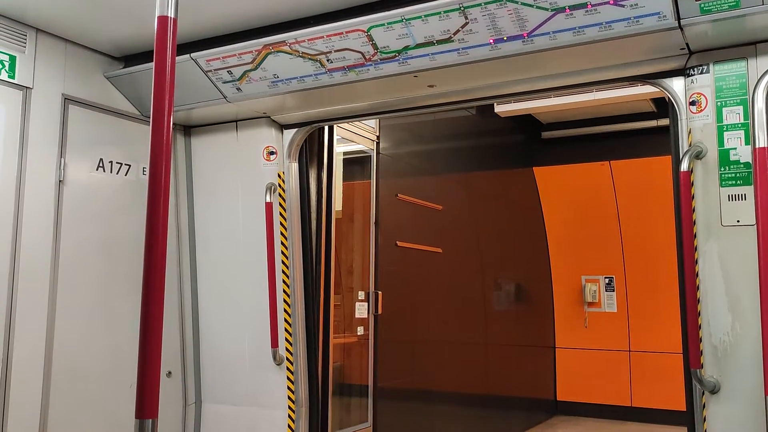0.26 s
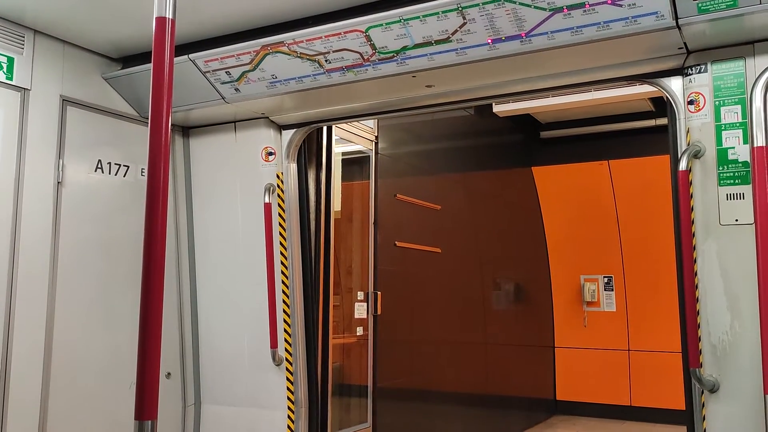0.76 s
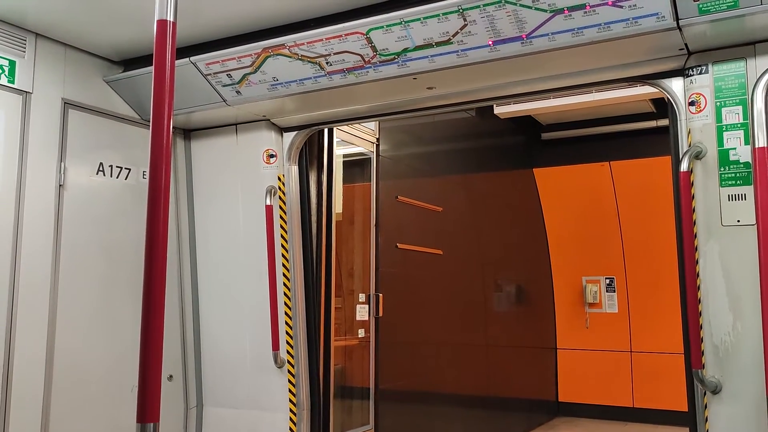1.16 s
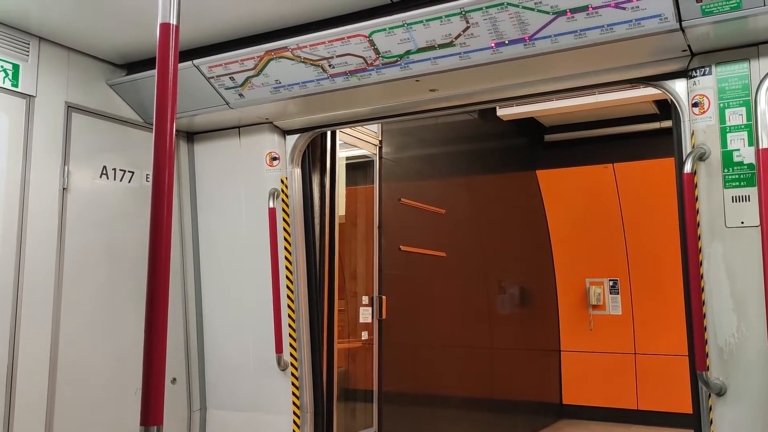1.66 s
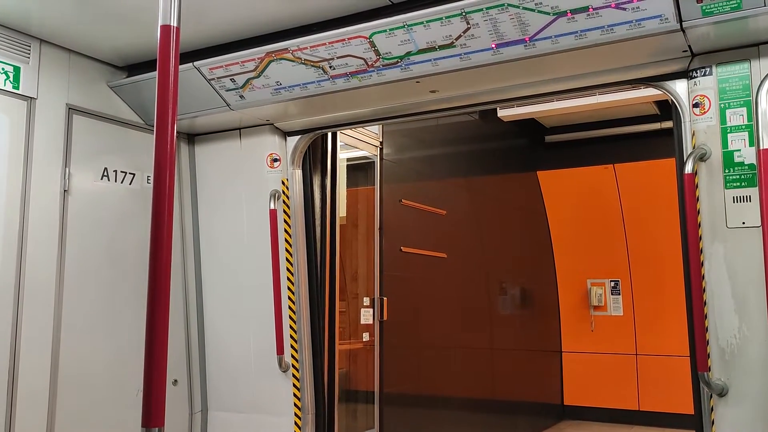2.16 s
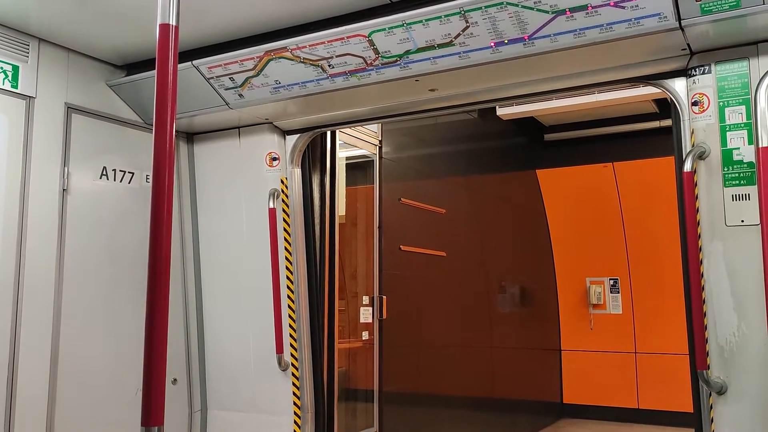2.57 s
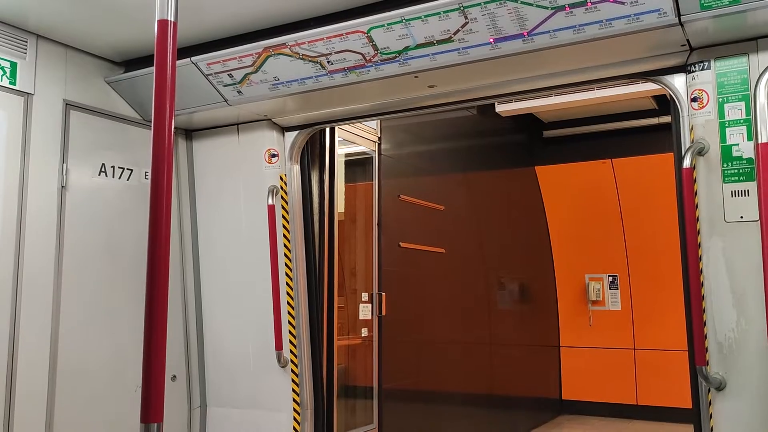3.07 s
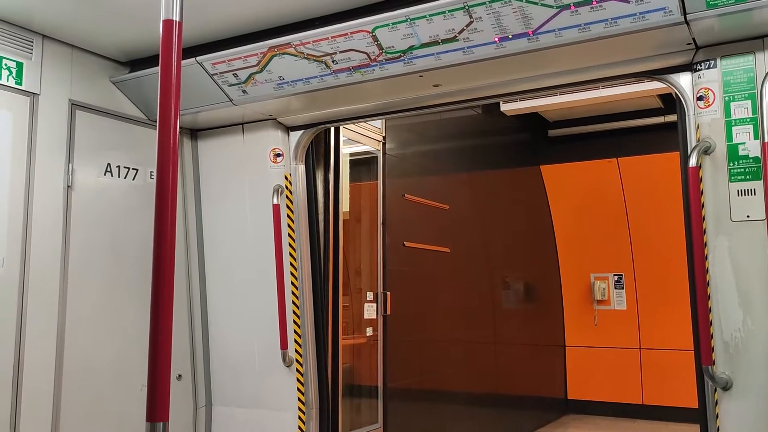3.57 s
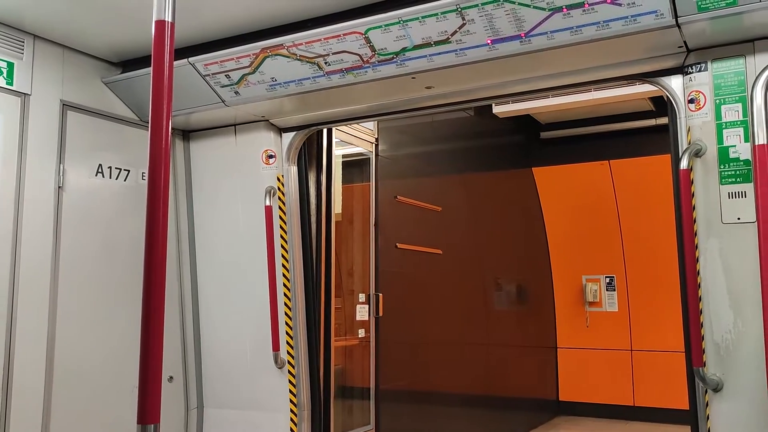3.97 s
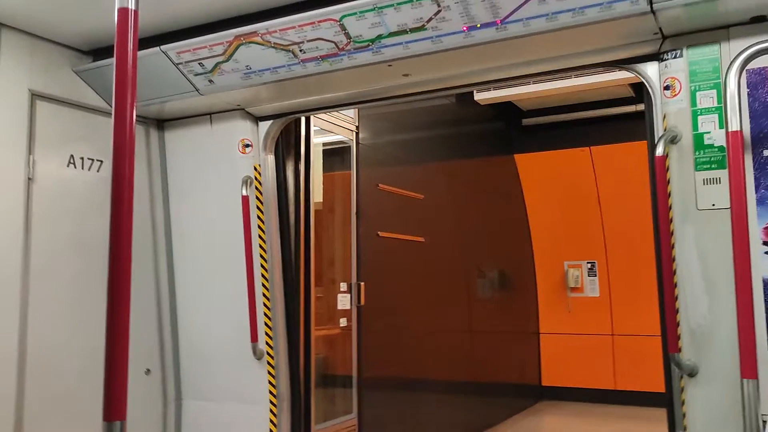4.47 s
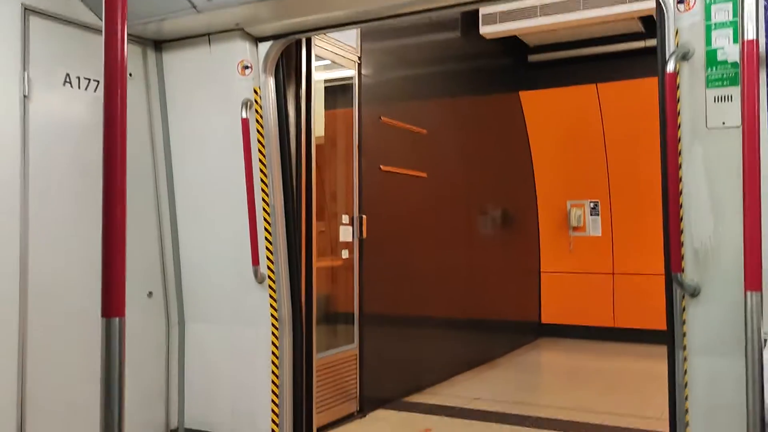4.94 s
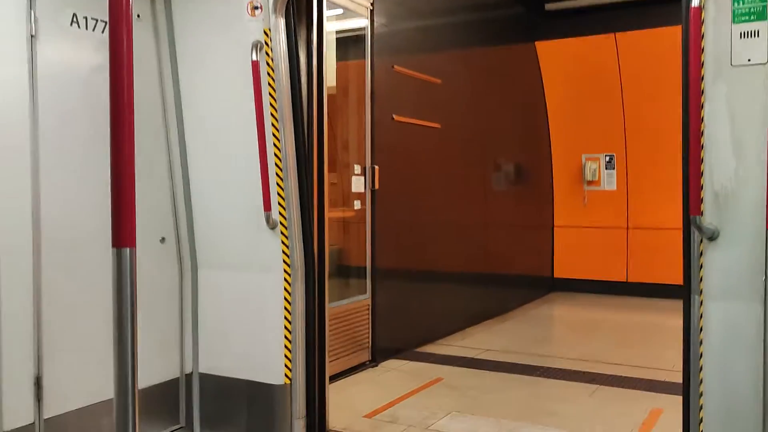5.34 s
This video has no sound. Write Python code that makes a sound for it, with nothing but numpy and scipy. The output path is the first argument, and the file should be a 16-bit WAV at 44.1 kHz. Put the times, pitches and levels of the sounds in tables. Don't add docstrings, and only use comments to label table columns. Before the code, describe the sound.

Inside a stopped train carriage, a buzzing low drone pulses slowly under soft air roar and hiss, and the hand-held phone clicks as its grip shifts.

```python
import sys
import numpy as np
from scipy import signal
from scipy.fft import rfft, irfft, next_fast_len
from scipy.io import wavfile
from scipy.ndimage import uniform_filter1d, map_coordinates

SR = 44100
rng = np.random.default_rng(int(sys.argv[2]) if len(sys.argv) > 2 else 0)


def inscribe(sig):
    pcm = np.round(np.clip(np.atleast_2d(sig).T, -1, 1) * 32767)
    wavfile.write(sys.argv[1], SR, pcm.astype(np.int16))


def to_linear_factor(level_db):
    exponent = np.asarray(level_db, float) / 20
    return 10 ** exponent


N = 247401
CROSSOVER_HZ = 2000


def along(f, v, hz):
    return np.interp(np.log(hz + 1), np.log(np.add(f, 1)), v)


def wobble(rate):
    return map_coordinates(rng.standard_normal(int(N * rate / SR) + 4), [np.arange(N) * rate / SR])


def filtered(x, response):
    m = next_fast_len(N + 8192)
    return irfft(rfft(x, m) * response(np.fft.rfftfreq(m, 1 / SR)), m)[..., :N]


def blotted(shape, high, wide):
    return uniform_filter1d(uniform_filter1d(rng.standard_normal(shape), size=high, axis=0), size=wide, axis=1)


def white(patchy_db):
    z = signal.stft(rng.standard_normal((2, N)), nperseg=512)[2]
    field = blotted(z.shape[1:], 6, 12)
    gain = to_linear_factor(patchy_db * field / field.std())
    return np.sqrt(SR / 2) * signal.istft(z * gain, nperseg=512)[1][:, :N]


# (multiple of the shaft rate [1], level [dB rms])
STEADY_ORDERS = [(6, -37.5), (8, -30.5), (11, -40), (12, -40), (14, -40), (15, -45), (17, -40), (19, -39.5),
                 (20, -39.5), (21, -43.5), (22, -41.5), (23, -56), (24, -54), (25, -44), (29, -41.5),
                 (33, -52), (35, -40.5)]
# (multiple of the shaft rate [1], shaft level [dB rms],
# rival level [dB rms], rival above the shaft [Hz], both in step at [s])
BEATING_ORDERS = [(1, -29.7, -25.4, -1.29, .637), (2, -26.3, -42.3, -.193, 2.122),
                  (5, -31.9, -34.3, .264, 2.34), (7, -28.3, -25, .266, 3.203),
                  (10, -35.6, -41.9, .171, 2.873)]


def compressor():
    shaft_hz, lowest_rival_fade = 29.485, 2.5
    t = np.arange(N) / SR
    turn = 2 * np.pi * shaft_hz * t + 0.03 * wobble(1.55)
    orders = []
    for k, db, rival_db, beat_hz, in_step_s in BEATING_ORDERS:
        rival = to_linear_factor(rival_db - lowest_rival_fade * t * (round(k) == 1))
        orders.append((k, to_linear_factor(db) + rival * np.exp(2j * np.pi * beat_hz * (t - in_step_s))))
    for k, db in STEADY_ORDERS:
        orders.append((k, to_linear_factor(db + 2.33 * wobble(2.47))))
    hum = np.zeros((2, N))
    for k, size in orders:
        k = round(k)
        start = rng.uniform(0, 2 * np.pi)
        apart = 0.015 * k * rng.standard_normal()
        phase = k * turn + start + np.array([[apart], [-apart]])
        hum += np.sqrt(2) * np.imag(size * np.exp(1j * phase))
    return hum


# (start [s], duration [s], share already crept by then [0-1])
GRIP_SHIFT = [
    (4.36, 0.18, 0.32),
    (4.42, 0.37, 0.07),
]


def grip():
    t = np.arange(N) / SR
    return np.clip([np.interp(t, [0, s, s + takes], [0, crept, 1]) for s, takes, crept in GRIP_SHIFT], 0, 1)


def rush_level(moved):
    return -0.37 - 0.24 * moved


# (frequency [Hz], level [dB per Hz])
ROAR_COLOUR = [(12, -42), (28, -41), (45, -48.5), (80, -46), (117, -36.5), (170, -44.5), (250, -44),
               (340, -48), (470, -49.5), (540, -54.5), (700, -49.5), (950, -55), (1300, -53), (2000, -58)]
# (frequency [Hz], left-right likeness [-1 to 1])
LIKENESS = [(60, 0.92), (130, 0.92), (290, 0.89), (640, 0.44), (1410, -0.15), (3100, 0.12), (6820, -0.01),
            (15000, 0.01)]


def roar():
    throb_hz, throb_width_hz = 115, 30
    throb_start_db, throb_fade = 1.5, 0.7
    moved = grip()[1]
    low_db = -3 + 0.3 * wobble(1.16) + 0.7 * moved
    rush_db = rush_level(moved) + np.array([[0.8], [-0.8]])

    def mid_side(hz):
        angle = np.arccos(np.clip(along(*np.transpose(LIKENESS), hz), -1, 1)) / 2
        colour = to_linear_factor(along(*np.transpose(ROAR_COLOUR), hz)) * (hz < CROSSOVER_HZ)
        return colour * [np.cos(angle), np.sin(angle)]

    mid, side = filtered(white(patchy_db=0.55), mid_side)
    air = np.array([mid + side, mid - side])
    throb = filtered(air, lambda hz: np.exp(-((hz - throb_hz) / throb_width_hz) ** 2))
    air = air + (to_linear_factor(throb_start_db - throb_fade * np.arange(N) / SR) - 1) * throb
    low = filtered(air, lambda hz: 1 / (1 + (hz / 400) ** 4))
    return to_linear_factor(low_db) * low + to_linear_factor(rush_db) * (air - low)


# (frequency [Hz], first grip [dB per Hz], second grip [dB per Hz])
LEFT_SHADE = [(1970, -57, -58.5), (3090, -61.5, -64.5), (3940, -64, -66), (4100, -66.5, -70.5),
              (5180, -67, -68.5), (5450, -70, -76.5), (8150, -68.5, -72), (8370, -72.5, -77),
              (8710, -95.5, -91), (9500, -81.5, -81), (10000, -82.5, -91), (12000, -79, -85.5),
              (14700, -82, -88), (15500, -96, -93)]
# (frequency [Hz], first grip [dB per Hz], second grip [dB per Hz])
RIGHT_SHADE = [(2000, -60, -59), (3000, -63, -62), (4000, -65, -66), (4400, -68, -70), (5200, -67.5, -69.5),
               (6000, -71, -75.5), (7000, -76, -81), (7600, -91, -86), (8600, -110, -89),
               (10000, -104, -87.5), (11800, -96, -86), (13000, -112, -86), (14700, -101, -86),
               (15600, -112, -93)]


def hiss():
    out = np.zeros((2, N))
    both_moved = grip()
    for port, noise, table, moved in zip(out, white(patchy_db=-0.02), (LEFT_SHADE, RIGHT_SHADE), both_moved):
        f, *grips = np.transpose(table)
        first, second = [filtered(noise, lambda hz: to_linear_factor(along(f, v, hz)) * (hz >= CROSSOVER_HZ)) for v in grips]
        port += (1 - moved) * first + moved * second
    return out * to_linear_factor(rush_level(both_moved[1]))


# (time [s], peak level [dB], centre [Hz], length [ms], left over right [dB])
NAIL_TICKS = [
    (.001, -29, 13000, 1, 12),
    (.023, -21, 12000, 1, 25),
    (.037, -14, 15200, 1.2, 25),
    (.046, -21, 14000, 1.5, 25),
    (3.785, -33, 12000, 1, 22),
    (4.184, -27, 12500, 1.2, 10),
    (4.198, -5, 2200, 0.52, -20),
    (4.721, -14, 14200, 1.2, -20),
]
# (time [s], peak level [dB], length [ms])
FINGER_TAPS = [
    (.050, -10, 1.3),
    (4.204, -15, 1.01),
]
# (centre [Hz], level [dB])
FINGER_BANDS = [(8300, -1), (14000, 0)]
# (time [s], peak level [dB], length [ms])
PALM_SLAP = (4.4535, -17, 5.5)
# (centre [Hz], level [dB])
PALM_BANDS = [(4200, 2), (6800, -4), (14500, -5)]


def contacts():
    puffs = list(NAIL_TICKS)
    touches = [(tap, FINGER_BANDS, 26) for tap in FINGER_TAPS] + [(PALM_SLAP, PALM_BANDS, -1)]
    for (s, db, ms), bands, pan_db in touches:
        puffs += [(s, db + more_db, hz, ms, pan_db) for hz, more_db in bands]
    return puffs


def sides(pan_db):
    return to_linear_factor([[min(pan_db, 0)], [min(-pan_db, 0)]])


def burst(size, hz, share):
    band = np.clip([hz * (1 - share), hz * (1 + share)], 50, 15700)
    sos = signal.butter(2, band, "band", fs=SR, output="sos")
    x = signal.sosfilt(sos, rng.standard_normal((2, size + 256)))[:, 256:]
    return x / x.std()


# (time [s], level [dB rms], length [s], centre [Hz], left over right [dB])
SKIN_RUBS = [
    (4.25, -41, 0.14, 13200, 18),
    (4.16, -43, .06, 14000, 12),
    (4.43, -50, .3, 15000, -8),
]


def hand():
    out = np.zeros((2, N))
    t = np.arange(SR // 40) / SR
    for s, db, hz, ms, pan_db in contacts():
        shape = np.exp(-((t - ms / 2000) / (ms / 2500)) ** 2)
        puff = shape * burst(len(t), hz, share=0.2)
        puff = puff / abs(puff).max(axis=1, keepdims=True)
        out[:, round(s * SR):][:, :len(t)] += to_linear_factor(db) * sides(pan_db) * puff
    for s, db, length, hz, pan_db in SKIN_RUBS:
        size = round(length * SR)
        rub = np.hanning(size) * burst(size, hz, share=0.1)
        out[:, round(s * SR):][:, :size] += to_linear_factor(db) * sides(pan_db) * rub
    return out


def scene():
    return compressor() + roar() + hiss() + hand()


def band_rms(v):
    return np.sqrt(np.mean(v ** 2, axis=3, keepdims=True))


def sum_difference(v):
    return np.array([v[0] + v[1], v[0] - v[1]]) / np.sqrt(2)


# (frequency [Hz], finest step [dB per Hz], most band rms over step [dB], mottling [dB])
TREBLE_GRAIN = [(2800, -76, 14, 0), (4300, -78, 14, 2), (5700, -75, 12, 6), (6600, -80, 12, 2.5),
                (7300, -80, 12, 1), (8200, -81, 12, 1), (8400, -82, -3, 3), (9200, -83, -3, 4.5),
                (10300, -92, -1.5, 5.5), (12000, -95, 0, 5.5), (13800, -95, 1, 5.5), (14700, -91, 0, 5),
                (15300, -82, -4, 4), (16000, -70, -5, 4)]
# (from [Hz], to [Hz], share of frames left empty [0-1])
DROPOUTS = [(9300, 9600, .22), (10000, 10300, .05), (14800, 16500, .3)]


def thinned(x):
    frame, offset, band = 1024, 425, 32
    n, k = np.arange(2 * frame)[:, None] + 0.5, np.arange(frame) + 0.5
    window = np.sqrt(2 / frame) * np.sin(np.pi * n / (2 * frame))
    basis = window * np.cos(np.pi / frame * (n + frame / 2) * k)
    lead = 2 * frame - offset
    blocks = np.pad(x, ((0, 0), (lead, 2 * frame + -(N + lead) % frame))).reshape(2, -1, frame)
    lines = blocks[:, :-1] @ basis[:frame] + blocks[:, 1:] @ basis[frame:]
    lines = lines.reshape(2, -1, frame // band, band)
    count = lines.shape[1]
    hz = (np.arange(frame // band)[:, None] + 0.5) * band * SR / (2 * frame)
    f, finest_db, fine_db, mottle_db = np.transpose(TREBLE_GRAIN)

    blots = blotted((count, frame), 2, 7)
    dips = np.minimum(blots / blots.std(), 0.5).reshape(lines.shape[1:])
    depth_db = along(f, mottle_db, hz)
    shifted = np.arange(count) * frame / SR > GRIP_SHIFT[0][0] + GRIP_SHIFT[0][1]
    lines = lines * to_linear_factor((1.2 + 0.6 * shifted)[:, None, None] * depth_db * dips - 0.1 * depth_db)

    level = band_rms(lines)
    joint = level.max(axis=0) < to_linear_factor(5) * level.min(axis=0)
    turned = np.where(joint, sum_difference(lines), lines)
    rms = band_rms(turned)
    finest = np.sqrt(SR / 2) * to_linear_factor(along(f, finest_db, hz))
    step = np.maximum(finest, rms / to_linear_factor(along(f, fine_db, hz) - 6 * joint))
    step = step * to_linear_factor(2.2 * rng.standard_normal(rms.shape))
    coarse = np.sign(turned) * np.floor(abs(turned) / step + 0.4) * step
    coarse = np.where(joint, sum_difference(coarse), coarse)

    s = (np.arange(count) * frame + frame - lead) / SR
    chance = np.convolve(rng.random(count) < 0.035, np.ones(3), "same") > 0
    touched = abs(s[:, None] - np.transpose(contacts())[0]).min(axis=1) < frame / SR
    attack = (chance | touched)[:, None, None]
    coarse = np.where(attack, lines * (level > 0.35 * finest), coarse)
    for low_hz, high_hz, share in DROPOUTS:
        luck = uniform_filter1d(rng.standard_normal(count), size=3)
        first, last = (int(v * 2 * frame / (band * SR)) for v in (low_hz, high_hz))
        coarse[:, (luck < np.quantile(luck, share)) & ~touched, first:last + 1] = 0

    lines = np.where(hz < f[0], lines, coarse).reshape(2, -1, frame)
    out = np.zeros_like(blocks)
    out[:, :-1] += lines @ basis[:frame].T
    out[:, 1:] += lines @ basis[frame:].T
    return out.reshape(2, -1)[:, lead:lead + N]


def top_cut(x):
    return signal.sosfilt(signal.butter(12, 16390, fs=SR, output="sos"), x)


def record(dry):
    mix = thinned(dry)
    return top_cut(mix)


dry = scene()
out = record(dry)
inscribe(out)
```